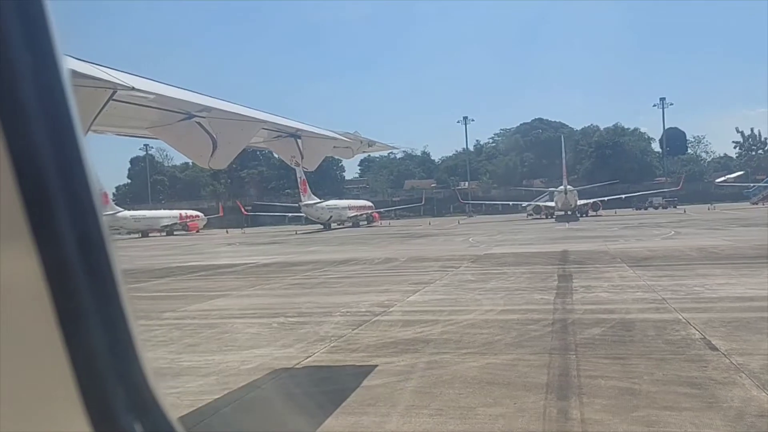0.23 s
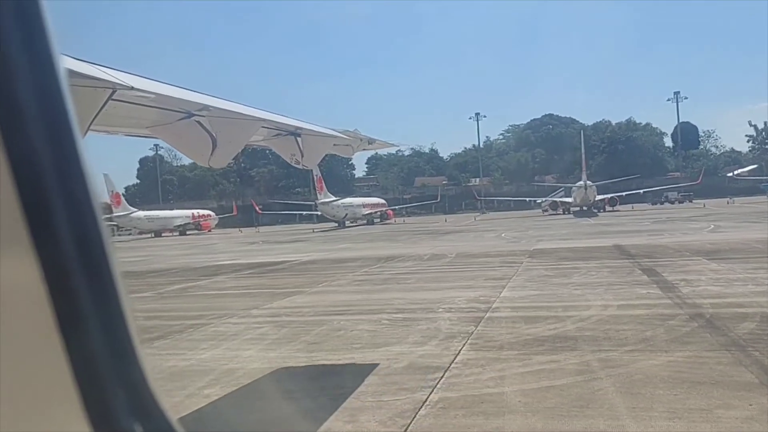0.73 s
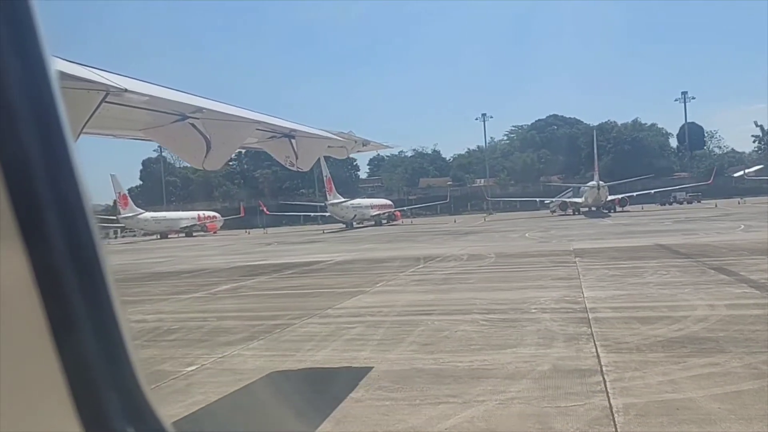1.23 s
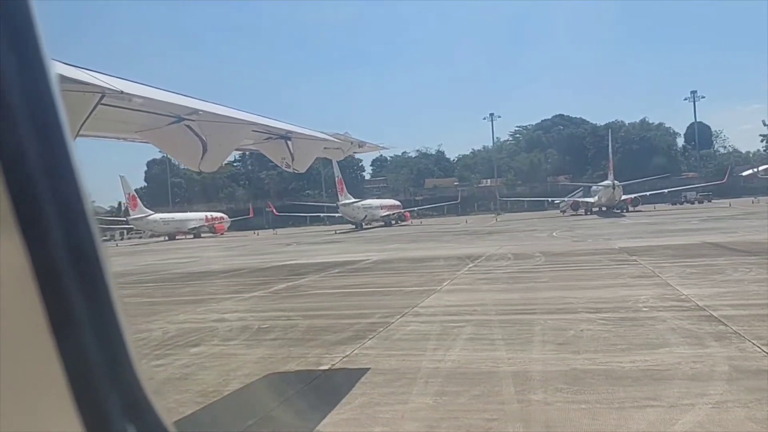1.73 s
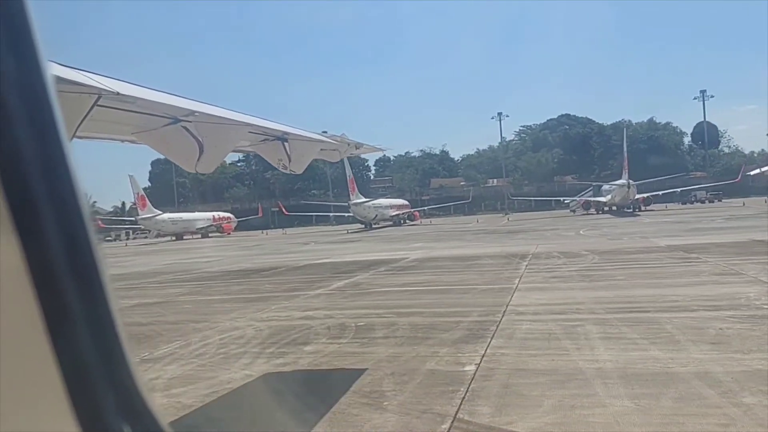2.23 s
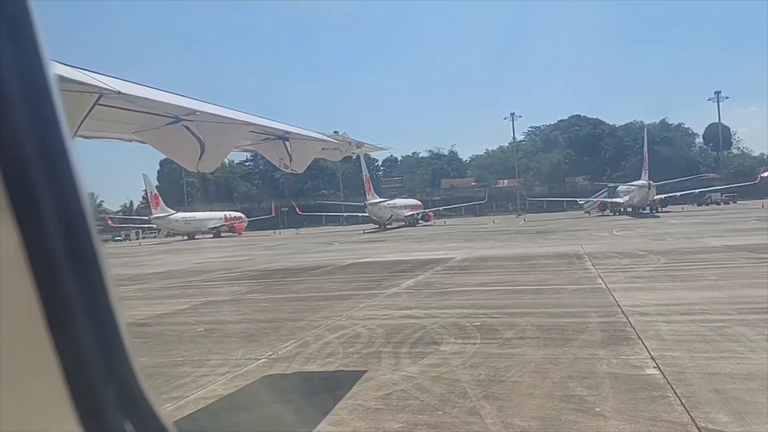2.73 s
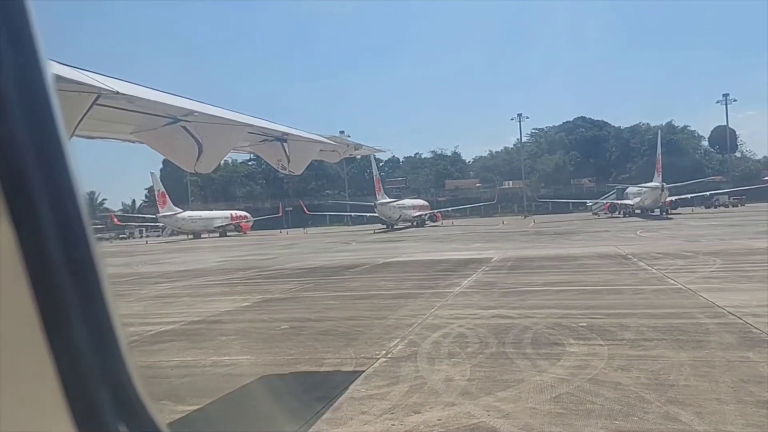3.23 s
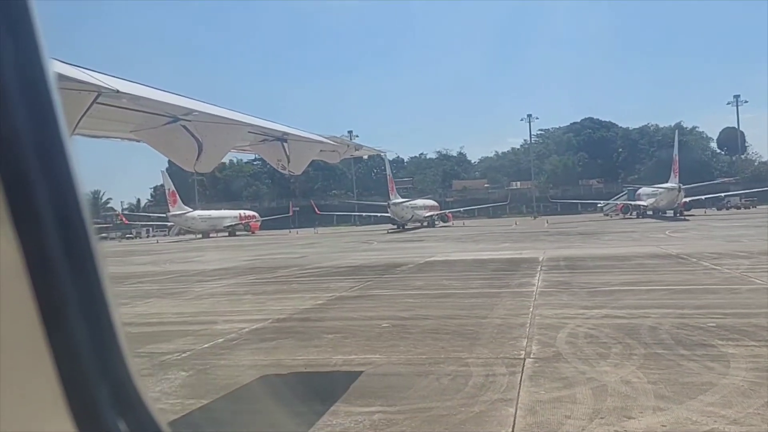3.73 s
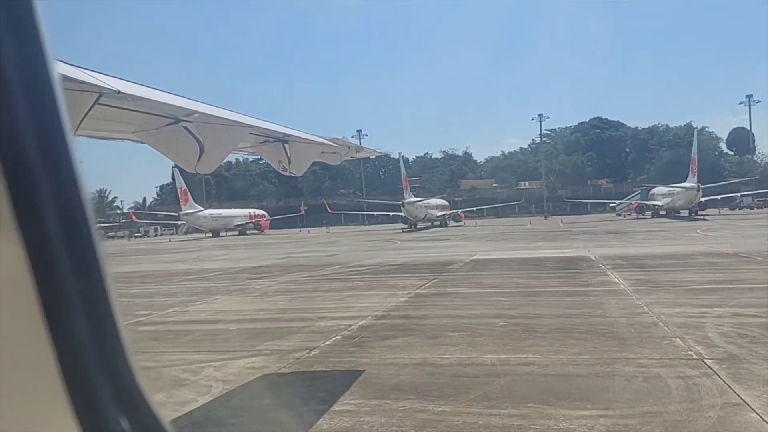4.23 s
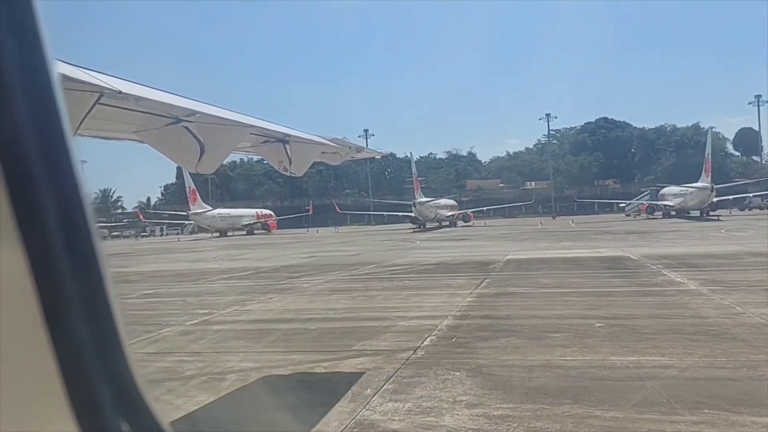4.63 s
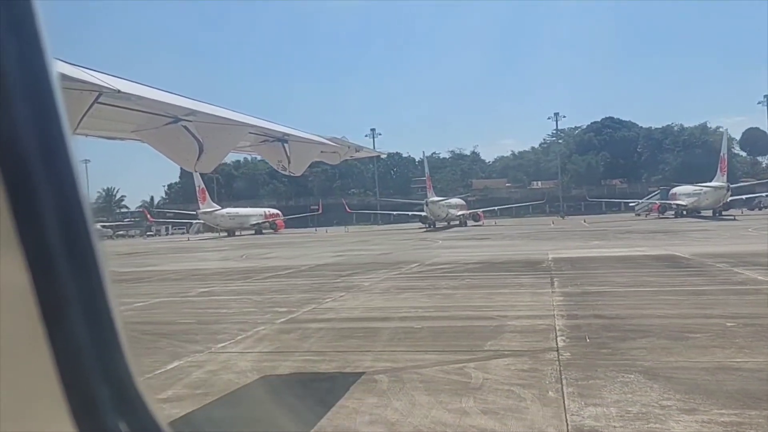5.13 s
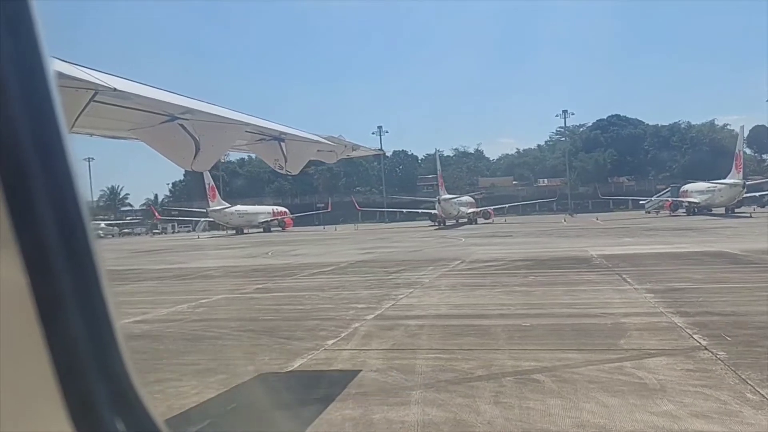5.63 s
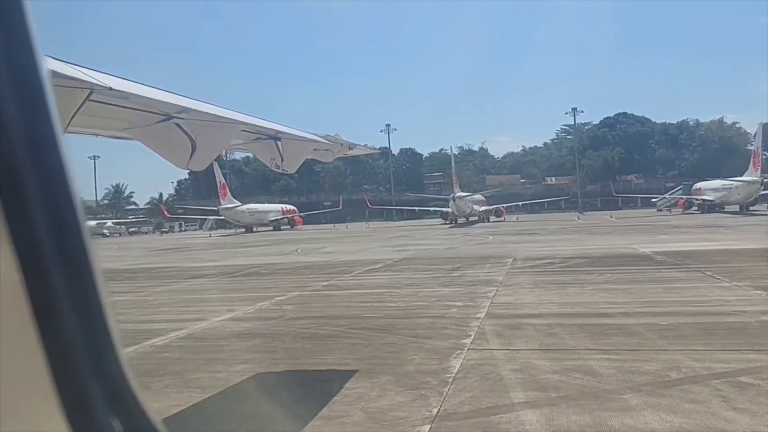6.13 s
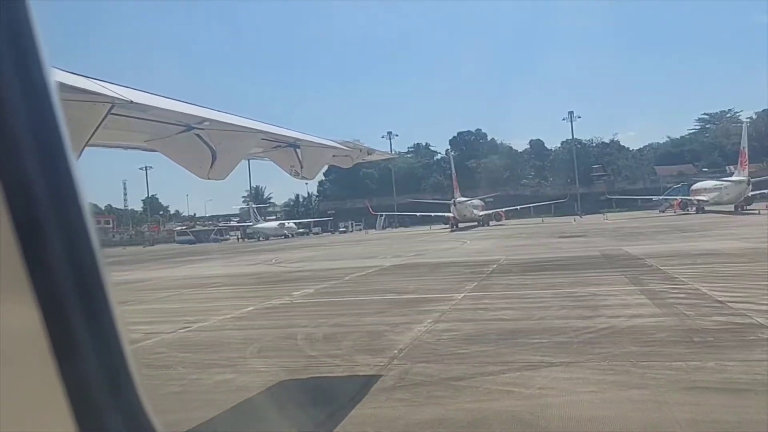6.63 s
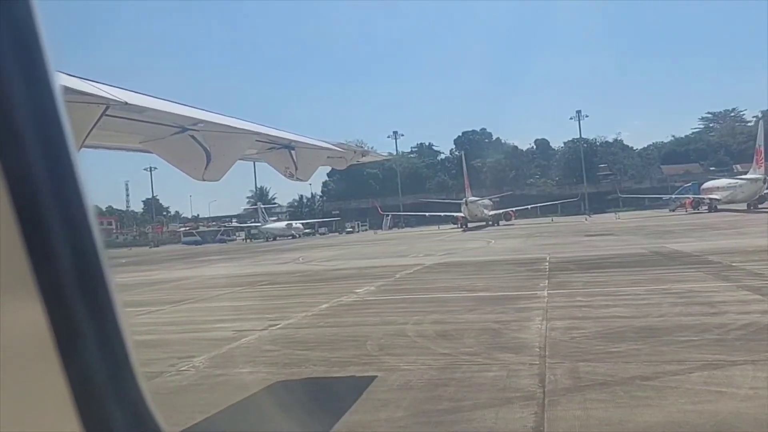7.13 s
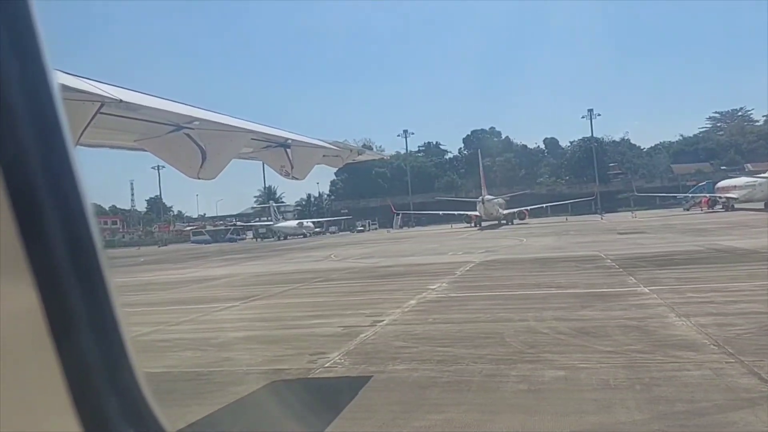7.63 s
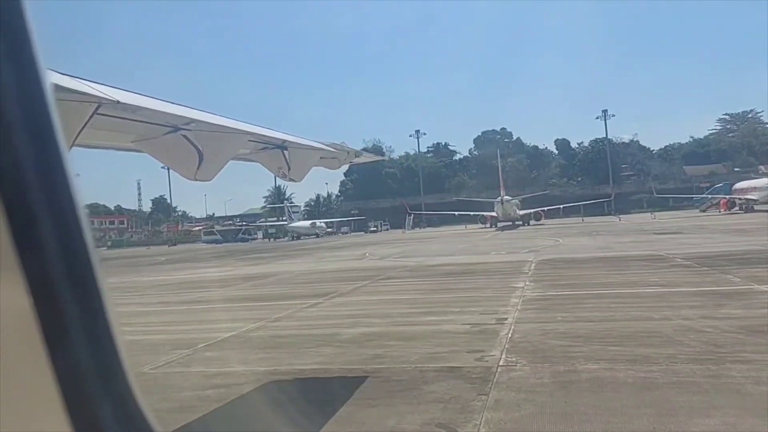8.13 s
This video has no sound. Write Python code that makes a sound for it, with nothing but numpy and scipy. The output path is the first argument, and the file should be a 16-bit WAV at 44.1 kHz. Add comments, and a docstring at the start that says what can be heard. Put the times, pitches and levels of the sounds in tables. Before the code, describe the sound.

Heard from a window seat, a twin turboprop rolls across an airport apron with a continuous deep rumble and a wavering propeller drone. A rushing wash swells and eases, strongest near the end. Dull landing gear thumps recur throughout, while wall panels on the right chirp and creak faintly over a hiss and thin whine. Late on comes a short tick, then a low knock.

```python
"""A window seat in a twin turboprop that taxis over a concrete apron.
Two propellers drone at slightly different blade-pass rates over the rumble of the hull and the
roar of their wash. Air hisses through panel gaps on the right; machinery hums and faintly whines.
Slab joints set the landing gear thumping, and the shaken cabin trim chirps, creaks and ticks."""
import sys
import numpy as np
from scipy import signal
from scipy.fft import rfft, irfft, next_fast_len
from scipy.io import wavfile

SR = 44100
rng = np.random.default_rng(int(sys.argv[2]) if len(sys.argv) > 2 else 0)


def digitize_waveform(pressure):
    """Quantize a signal to 16-bit integers and store it at the path in sys.argv[1].

    Rows of a 2-D input are taken as channels; values are limited to [-1, 1].
    """
    field = np.atleast_2d(pressure).T
    bounded = np.clip(field, -1, 1)
    quanta = np.round(bounded * 32767).astype(np.int16)
    wavfile.write(sys.argv[1], SR, quanta)


N = 369999
TIME = np.arange(N) / SR


def from_db(db):
    """Amplitude ratio of a level in decibels."""
    return 10 ** (np.asarray(db) / 20)


def unit_rms(x):
    """Normalisation to a root mean square of 1."""
    return x / np.sqrt(np.mean(x ** 2) + 1e-20)


def in_time(curve):
    """Linear interpolation of (time, value) rows at every sample."""
    return np.interp(TIME, *np.transpose(curve))


def pan(left_db):
    """Interaural level difference: left and right gains whose mean is 1."""
    gains = from_db([[left_db / 2], [-left_db / 2]])
    return gains / gains.mean()


def drift(rate_hz):
    """Low-passed noise: a smooth random fluctuation with a spread of about 1."""
    pole = np.exp(-200 * np.pi * rate_hz / SR)  # one step per 100 samples
    steps = rng.standard_normal(N // 100 + 2002)
    slow = signal.lfilter([1], [1, -2 * pole, pole * pole], steps)[2000:]
    return np.interp(np.arange(N) / 100, np.arange(len(slow)), unit_rms(slow))


def flutter(depth, rate_hz):
    """Random amplitude modulation with a mean power of about 1."""
    return (1 + depth * drift(rate_hz)) / np.hypot(1, depth)


def cabin_noise(spectrum, ripple_db):
    """Noise of a given spectral density, finely rippled by the interference of cabin reflections."""
    size = next_fast_len(N)
    hz = np.arange(size // 2 + 1) * SR / size
    log_hz = np.log2(np.maximum(hz, 1))
    points_hz, levels = np.transpose(spectrum)
    points = np.log2(points_hz)
    octaves_outside = np.abs(log_hz - np.clip(log_hz, points[0], points[-1]))
    echoes_s = rng.uniform(.003, .03, size=10)
    ripple = unit_rms(np.cos(2 * np.pi * np.outer(echoes_s, hz)).sum(axis=0))
    gain = from_db(np.interp(log_hz, points, levels) - 20 * octaves_outside + ripple_db * ripple)
    return irfft(rfft(rng.standard_normal(size)) * gain, size)[:N] * np.sqrt(SR / 2)


def resonance(x, hz, width_hz):
    """Response of a damped oscillator: two poles, gain 1 at the peak."""
    radius = np.exp(-np.pi * width_hz / SR)
    feedback = [1, -2 * radius * np.cos(2 * np.pi * hz / SR), radius ** 2]
    return signal.lfilter(np.array([1, 0, -1]) * (1 - radius ** 2) / 2, feedback, x + 1e-18)


def add(track, onset_s, sound):
    """Superposition of a sound on a track from its onset."""
    start = max(round(onset_s * SR), 0)
    track[start:start + len(sound)] += sound[:max(N - start, 0)]


def machinery(waver_hz):
    """Rotation radiates pure tones: shaft hums and turbine whines, wavering in amplitude and phase."""
    # (frequency [Hz], start level [dB], end level [dB], left-right [dB], left lead [rad], waver [0-1])
    tones = [(50.2, -35, -36, -3, 0, .15), (1032, -61, -61, 2, 3, .3), (3090, -79, -66, -13, 0, .5),
             (3495, -64.5, -63.5, -17, 0, .22), (4133, -78, -78, -12, 0, .4)]
    out = np.zeros((2, N))
    for hz, start_db, end_db, left_db, lead, waver in tones:
        phase = 2 * np.pi * (hz * TIME + rng.random()) + 2 * waver * drift(waver_hz)
        strength = from_db(np.linspace(start_db, end_db, N)) * flutter(waver, waver_hz)
        out += strength * pan(left_db) * np.sqrt(2) * np.sin(phase + np.array([[lead], [0]]))
    return out


def machine_hum(hz, beat_hz, in_step_s, twin_db):
    """Beating: two low machine tones, nearly at one pitch, interfere at their difference frequency."""
    # swell of the pair: (time [s], level [dB])
    swell = [(0, -33), (.45, -22), (.85, -19), (1.4, -29), (2.6, -22.5), (3.4, -28), (3.75, -22.5),
             (4.9, -28), (5.4, -23), (6.9, -26), (8.39, -26.5)]
    phase = 2 * np.pi * hz * TIME + .94 * drift(2.2)
    twin_phase = phase - 2 * np.pi * beat_hz * (TIME - in_step_s) + .4 * drift(2.2)
    pair = unit_rms(np.sin(phase) + from_db(twin_db) * np.sin(twin_phase))
    return from_db(in_time(swell)) * flutter(.2, rate_hz=8.1) * pair * pan(-1)


def side_wall_air():
    """Flow noise along the right wall is coloured by the cavity resonances of the panel gaps."""
    # hiss that excites the gaps: (frequency [Hz], spectral density [dB per Hz])
    spectrum = [(400, -77.5), (720, -68), (1250, -79), (2000, -79), (2700, -76.5), (3900, -84.5),
                (4600, -84), (5200, -91), (5800, -94.5), (7200, -91), (9400, -108), (11000, -109),
                (13000, -103), (15000, -119)]
    # gap resonances: (frequency [Hz], bandwidth [Hz], boost [dB])
    gaps = [(576, 34, 2.5), (705, 150, 1), (1590, 23, 6.5), (2323, 140, 6), (4935, 160, 5.5)]
    # rise and fall of the flow: (time [s], gain [dB])
    flow = [(0, 1.5), (1.1, -0.4), (2.0, 0), (2.8, 1), (3.8, -0.1), (5.4, 0), (6.5, 1.1), (7.5, 0.2),
            (8.39, 0.9)]
    hiss = cabin_noise(spectrum, ripple_db=.93)
    for hz, width_hz, boost_db in gaps:
        hiss = hiss + (from_db(boost_db) - 1) * resonance(hiss, hz, width_hz)
    return from_db(in_time(flow)) * hiss * from_db([[-34.5], [0]])


def propeller_wash():
    """The wash forms a diffuse field, uncorrelated at the ears; a roar swells as the aircraft turns."""
    # steady wash: (frequency [Hz], spectral density [dB per Hz])
    steady_spectrum = [(130, -60.5), (260, -58), (335, -58), (420, -65.5), (560, -73.5), (900, -79),
                       (1250, -84), (2300, -85.5), (3500, -94.5), (4800, -97.5), (6000, -102.5),
                       (8700, -103), (10000, -108), (15500, -113)]
    # roar at a gain of 0 dB: (frequency [Hz], spectral density [dB per Hz])
    roar_spectrum = [(330, -66.5), (400, -58.5), (580, -64.5), (850, -73.5), (1150, -76.5), (1550, -82.5),
                     (2000, -93)]
    steady = np.array([cabin_noise(steady_spectrum, ripple_db=1.64) for ear in range(2)])
    roar = np.array([cabin_noise(roar_spectrum, ripple_db=3.5) for ear in range(2)])
    return steady + from_db(wash_swell_db()) * roar * pan(-4.5)


def wash_swell_db():
    """Slow amplitude envelope of the roar of the wash, in decibels."""
    # (time [s], gain [dB])
    swell = [(0, -3), (1, -20.5), (2.5, -4.5), (3.6, -15.5), (5.2, -8), (6.0, -2.5), (6.7, -0.5),
             (7.4, -3.5), (8.39, -2.5)]
    return in_time(swell)


def trim_chirps(length_s, roughness_rad, overtone_db, rebound_db, scuff_db):
    """Stick-slip friction: a panel edge squeaks for a few milliseconds, then once more, weakly."""
    # slips: (time [s], relative level [dB], pitch [Hz])
    slips = [(0.1506, -43, 4860), (0.208, -31, 4840), (0.8275, -44, 4810), (1.8387, -44, 4700),
             (1.8751, -37, 4700), (2.0208, -43, 4420), (2.186, -38.5, 4760), (2.663, -38, 4900),
             (2.6857, -35, 4800), (3.114, -36, 4840), (3.193, -37, 4450), (3.2246, -34.5, 4800),
             (3.3732, -41.5, 4800), (3.5776, -34, 4850), (3.623, -36, 4900), (4.5114, -33.5, 4770),
             (4.804, -43, 4740), (4.8385, -36.5, 5000), (4.8936, -36.5, 4930), (5.874, -43, 4800),
             (6.712, -40, 4840), (6.7655, -39, 4780), (6.8277, -31.5, 4950), (6.8583, -34.5, 5070),
             (6.9691, -45, 5500), (7.012, -35.5, 5240), (7.5118, -40, 5050), (7.5554, -36, 4900),
             (7.587, -33, 4940), (7.6311, -40, 4900), (7.8989, -44, 4780), (8.0755, -42, 4870)]
    out, t = np.zeros(N), TIME[:SR // 40]
    wobble_filter = signal.butter(2, 350, fs=SR, output="sos")
    for onset_s, db, hz in slips:
        length = length_s * np.exp(.2 * rng.standard_normal())
        wobble = unit_rms(signal.sosfilt(wobble_filter, rng.standard_normal(len(t))))
        scuff = unit_rms(resonance(rng.standard_normal(len(t)), 7900, 2500))
        slip = np.exp(-(2 * (t - length) / length) ** 2)
        rebound = from_db(rebound_db) * np.exp(-(2 * (t - 2.3 * length) / length) ** 2)
        phase = 2 * np.pi * hz * t + roughness_rad * wobble
        squeak = np.sin(phase) + from_db(overtone_db) * np.sin(2 * phase) + from_db(scuff_db) * scuff
        add(out, onset_s, from_db(db) * (slip + rebound) * squeak)
    return out


def trim_creaks(grain_spread_db):
    """Modal excitation: bursts of tiny slips of uneven size ring a panel."""
    # bursts: (time [s], excitation level [dB], decay time constant [s])
    bursts = [(.21, -59, 0.0059), (0.422, -64, 0.25), (.93, -63, .12), (3.192, -53, .006),
              (3.48, -61, 0.023), (3.613, -60, 0.034), (4.339, -46, 0.022), (4.6, -53, .005),
              (6.093, -57, .005), (6.827, -61, 0.044), (6.93, -58.5, .07), (7.001, -53, 0.014)]
    # panel modes: (frequency [Hz], bandwidth [Hz], gain [dB])
    modes = [(6050, 1100, 1), (7400, 1200, 0), (12300, 1200, -7.5), (13400, 1000, -6)]
    slips, t = np.zeros(N), TIME[:SR // 4]
    for onset_s, db, decay_s in bursts:
        grains = rng.standard_normal(len(t)) * from_db(grain_spread_db * rng.standard_normal(len(t)))
        add(slips, onset_s, from_db(db) * np.exp(-t / decay_s) * unit_rms(grains))
    return sum((-1) ** k * from_db(db) * resonance(slips, hz, width_hz)
               for k, (hz, width_hz, db) in enumerate(modes))


def trim_ticks():
    """Impulse response of a heavily damped panel: it snaps into place with a short, bright crack."""
    # snaps: (time [s], impulse level [dB])
    snaps = [(4.6025, -32), (6.7848, -21)]
    impulses = np.zeros(N)
    for onset_s, db in snaps:
        add(impulses, onset_s, from_db([db]))
    return resonance(impulses, hz=6500, width_hz=4700) * pan(2.5)


def cabin_trim():
    """Friction sounds of the right wall; lightly damped modes of the plastic ring on after each chirp."""
    chirps = from_db(1) * trim_chirps(length_s=.0031, roughness_rad=.6, overtone_db=-36,
                                      rebound_db=-9.5, scuff_db=-24.5)
    ringing = from_db(-4.5) * sum(resonance(chirps, hz, width_hz=35) for hz in (4880, 5500))
    creaks = from_db(11) * trim_creaks(grain_spread_db=6.5)
    return (chirps + ringing + creaks) * pan(-14)


def hull_rumble():
    """Structure-borne rolling noise follows the roughness of the concrete."""
    # rumble: (frequency [Hz], spectral density [dB per Hz])
    spectrum = [(20, -71), (36, -65.5), (50, -56), (61, -42.5), (80, -39), (118, -38), (145, -41),
                (180, -48.5), (232, -46.5), (297, -58), (400, -57.5), (460, -63), (700, -73), (1100, -92)]
    # rougher and smoother stretches: (time [s], gain [dB])
    ride = [(0, 2), (.6, -0.5), (1.3, -0.9), (2.3, -0.1), (3.15, 1), (3.6, -1.5), (4.8, 0), (5.9, 0),
            (6.65, 1.5), (7.4, -0.7), (8.39, 1.4)]
    bumps_db = .32 * drift(2.1)
    return from_db(in_time(ride) + bumps_db) * cabin_noise(spectrum, ripple_db=-.6)


def joint_thumps(rise_s, hold_s, t60_s, grit, lowest_hz):
    """Damped free vibration: each joint sets gear and hull swinging; the tyre softens the onset."""
    # wheels meet slab joints: (time [s], level before filtering [dB], pitch [Hz])
    joints = [(0.47, -8, 62.3), (1.823, -15, 72), (3.155, -6.5, 79.2), (4.51, -10.5, 65.3), (5.83, -14, 64),
              (6.951, -13.5, 64), (7.734, -12, 79.3)]
    out, t = np.zeros(N), TIME[:SR]
    envelope = np.minimum(t / rise_s, 1) ** 2 * from_db(-60 * np.maximum(t - hold_s, 0) / t60_s)
    for onset_s, db, hz in joints:
        shudder = unit_rms(resonance(rng.standard_normal(SR), hz, width_hz=12))
        swing = np.sin(2 * np.pi * hz * t) + grit * shudder
        swing = signal.sosfilt(signal.butter(2, 3 * hz, fs=SR, output="sos"), swing)
        add(out, onset_s, from_db(db) * envelope * swing)
    return signal.sosfilt(signal.butter(6, lowest_hz, "high", fs=SR, output="sos"), out)


def gear_knock():
    """Impact transient: the gear strut jolts the floor for about two cycles."""
    # (time [s], level [dB], pitch [Hz], half length [s])
    jolt = (6.936, -4.5, 140, .008)
    centre_s, db, hz, half_length_s = jolt
    t = TIME - centre_s
    return -from_db(db) * np.exp(-(t / half_length_s) ** 2) * np.sin(2 * np.pi * hz * t)


def blade_harmonics(blade_hz, orders, jitter_rad, flutter_depth):
    """Periodic blade passage gives a harmonic series; gusty inflow modulates phase and amplitudes."""
    blade_phase = 2 * np.pi * np.cumsum(blade_hz * np.ones(N)) / SR + jitter_rad * drift(4.5)
    out = np.zeros((2, N))
    for multiple, db, left_db, lead in orders:
        phase = multiple * blade_phase + rng.uniform(0, 2 * np.pi) + np.array([[lead], [0]])
        strength = from_db(db) * flutter(flutter_depth, rate_hz=4.95)
        out += strength * pan(left_db) * np.sqrt(2) * np.sin(phase)
    return out


def far_propeller(blade_hz):
    """Rotational noise at a steady blade-pass frequency, slightly out of step with the near propeller."""
    # harmonics: (multiple, level [dB], left-right [dB], left lead [rad])
    orders = [(1, -29.5, -1.5, -0.7), (3, -37.5, -2.5, -0.23), (4, -42, 9, 1.3), (5, -50, 2.5, -0.2),
              (6, -51.5, -1, -0.62)]
    return blade_harmonics(blade_hz, orders, jitter_rad=.25, flutter_depth=.3)


def near_propeller(mean_blade_hz, hunt_hz, hunt_period_s, fastest_s):
    """Frequency modulation of the blade tones: the governor hunts around its set speed."""
    # the drone swells and fades in the cabin: (time [s], relative level [dB])
    swell = [(0, -22), (1.2, -23), (1.85, -23), (2.15, -30), (2.55, -22.5), (2.8, -31), (3.05, -20.5),
             (3.3, -37), (3.62, -27.5), (3.9, -21.5), (4.28, -27), (4.6, -21.5), (5.1, -31.5), (5.7, -30),
             (6.7, -23.5), (7.3, -26), (7.7, -31.5), (8.39, -27)]
    # drone harmonics: (multiple, relative level [dB], left-right [dB], left lead [rad])
    drone_orders = [(2, -5, -0.5, -0.069), (3, -2.5, -4, -0.034)]
    # upper harmonics: (multiple, level [dB], left-right [dB], left lead [rad])
    upper_orders = [(4, -40.5, -2, 1.3), (5, -39.5, -2, 0.094), (6, -45, 5.5, 0.032),
                    (9, -56.5, -1.5, 0.15)]
    hunting = hunt_hz * np.cos(2 * np.pi * (TIME - fastest_s) / hunt_period_s)
    blade_hz = mean_blade_hz + hunting + .148 * drift(1.2)
    drone = blade_harmonics(blade_hz, drone_orders, jitter_rad=.12, flutter_depth=.25)
    upper = blade_harmonics(blade_hz, upper_orders, jitter_rad=.1, flutter_depth=.66)
    wash_db = wash_swell_db()
    upper_db = .16 * (wash_db - wash_db.mean())  # follows a share of the wash's swell
    return from_db(in_time(swell) - 1.43) * drone + from_db(upper_db) * upper


def scene():
    """Superposition of engines, hull, air and trim at the seat."""
    engines = near_propeller(mean_blade_hz=82.26, hunt_hz=.42, hunt_period_s=.97, fastest_s=.503)
    engines += far_propeller(blade_hz=84.95)
    engines += machine_hum(hz=129.2, beat_hz=1.81, in_step_s=.33, twin_db=-8.5)
    engines += machinery(waver_hz=1.2)
    hull = hull_rumble() + gear_knock()
    hull += joint_thumps(rise_s=.02, hold_s=.041, t60_s=.43, grit=.13, lowest_hz=44.5)
    return engines + hull * pan(-2) + propeller_wash() + side_wall_air() + cabin_trim() + trim_ticks()


def record(dry):
    """Band limiting: a steep low-pass cuts the top after a 4 ms fade at each end."""
    edge_s = np.minimum(TIME, TIME[::-1])
    fade = np.sin(np.pi / 2 * np.minimum(edge_s / .004, 1)) ** 2
    return signal.sosfilt(signal.ellip(12, .1, 90, 15720, fs=SR, output="sos"), dry * fade)


dry = scene()
out = record(dry)
digitize_waveform(out)
```